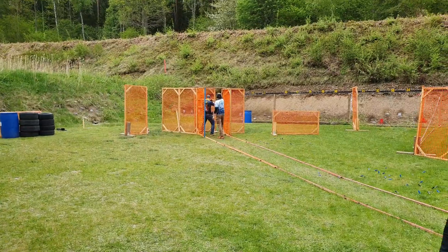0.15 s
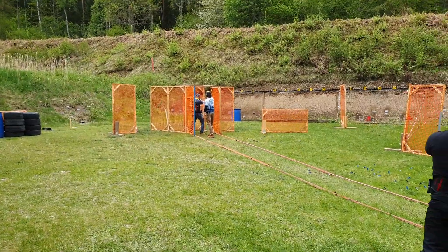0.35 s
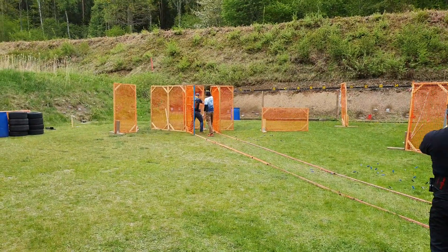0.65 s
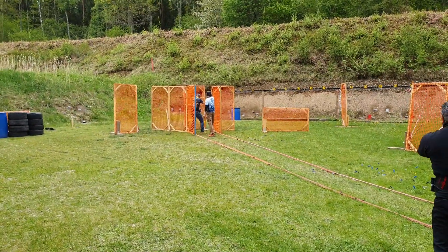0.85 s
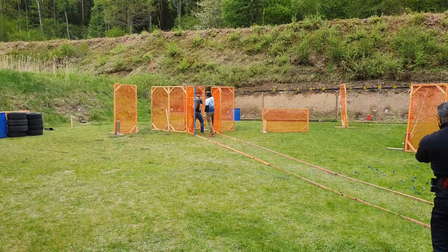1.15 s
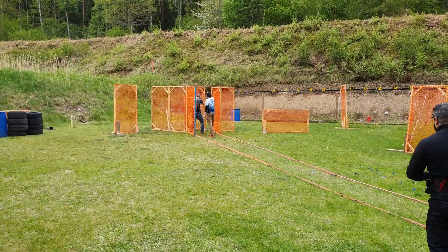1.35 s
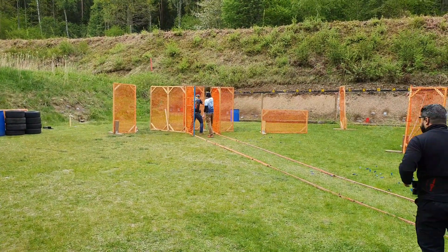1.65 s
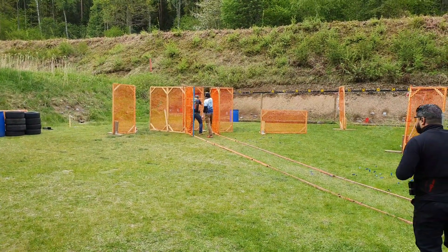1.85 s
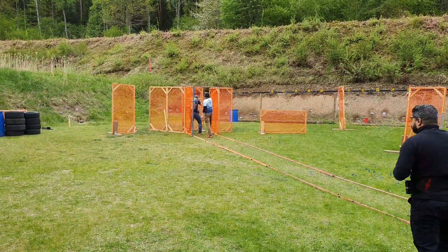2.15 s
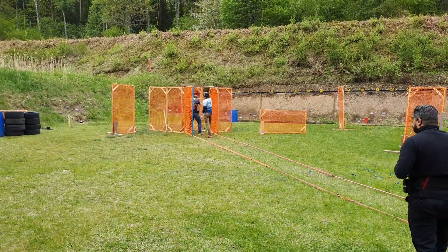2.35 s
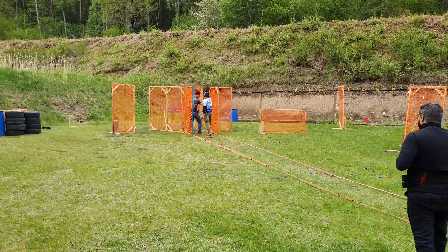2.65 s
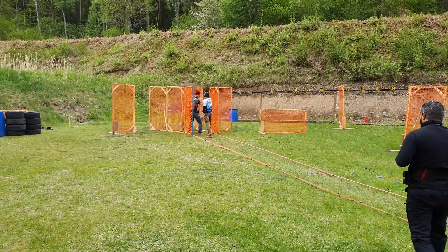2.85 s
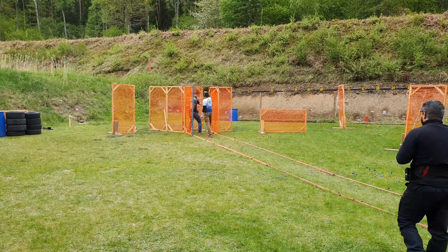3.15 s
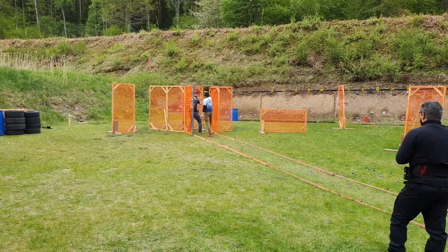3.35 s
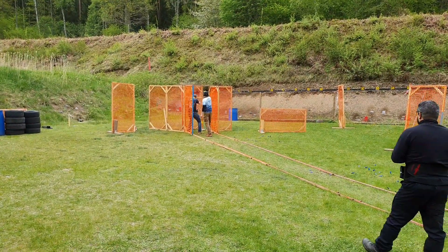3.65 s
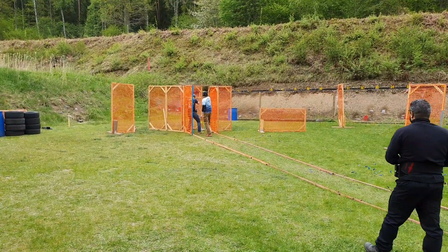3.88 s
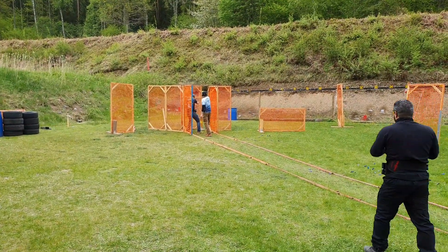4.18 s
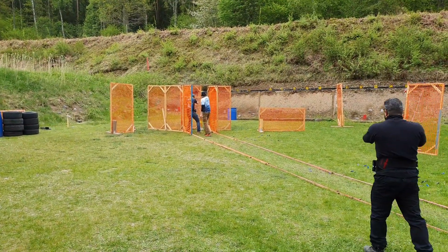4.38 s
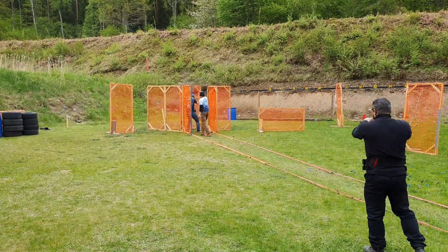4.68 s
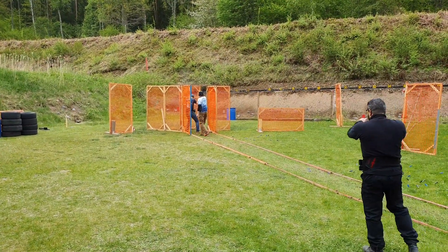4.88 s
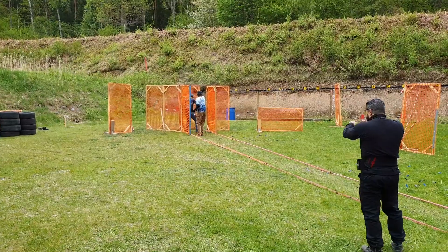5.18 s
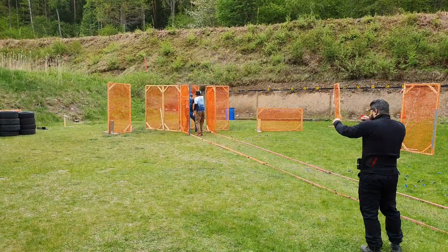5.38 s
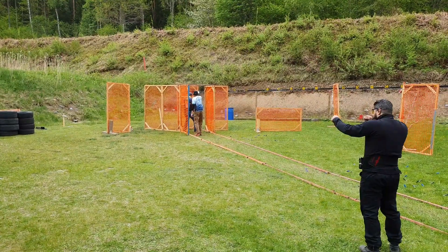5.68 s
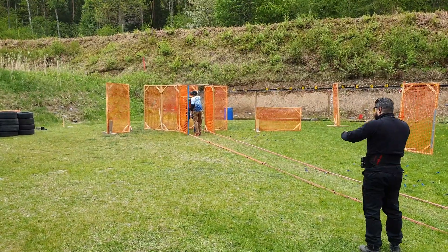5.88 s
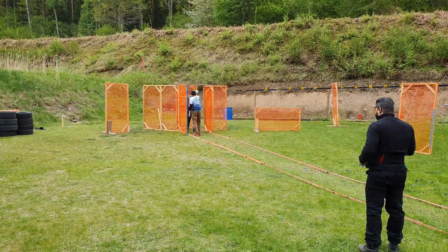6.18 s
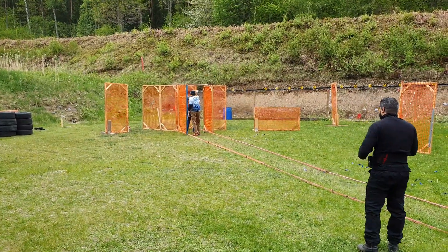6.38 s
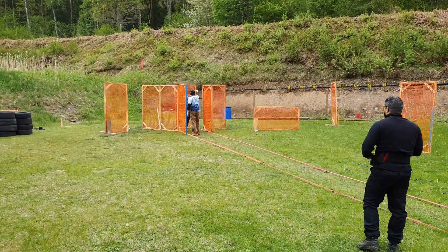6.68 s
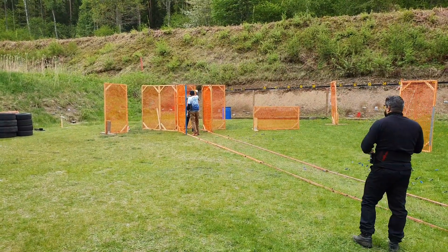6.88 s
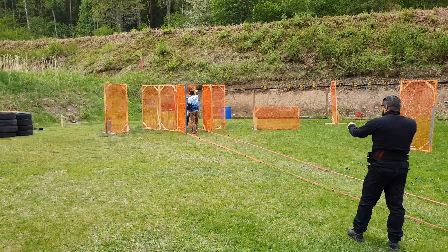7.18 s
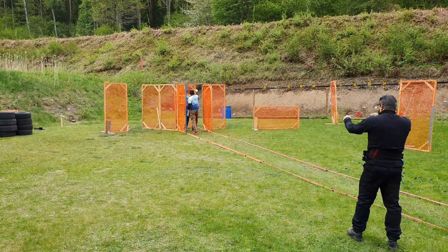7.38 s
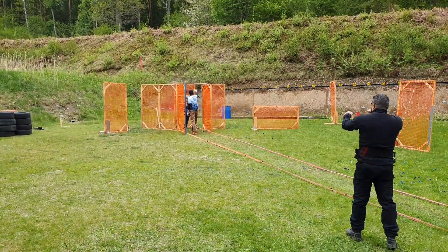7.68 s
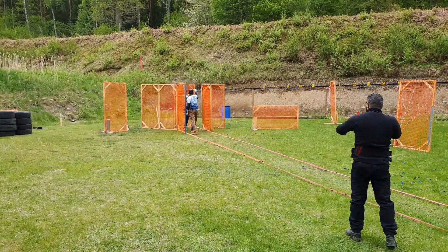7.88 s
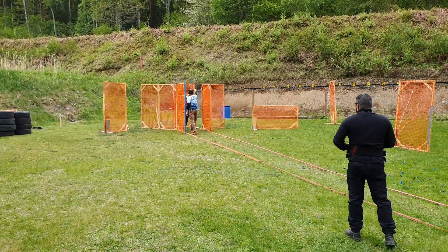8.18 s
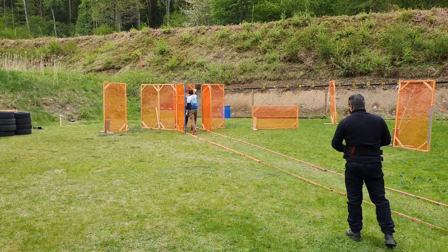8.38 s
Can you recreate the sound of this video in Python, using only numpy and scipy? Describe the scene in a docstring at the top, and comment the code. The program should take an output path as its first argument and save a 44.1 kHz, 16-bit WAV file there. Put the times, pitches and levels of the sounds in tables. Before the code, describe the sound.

Outdoors, single shotgun blasts fire about twenty metres away, slapping off earth banks and rolling through trees, with steel pings, gear clacks and wind buffeting.

```python
"""Shotgun fire in a grassy bay

Five shotgun shots some twenty metres away: pressure pulses along several paths, then echoes made of shaped noise
from the earth berms and a long roll from the forest. Four loads strike steel plates, which ring at their modes.
Metal gear clacks and clothing swishes around the shots as noise bursts; wind noise buffets the microphone.
Leaves and faint birdsong are bands of noise in the background."""
import sys
import numpy as np
from scipy import signal
from scipy.fft import rfft, irfft
from scipy.io import wavfile
from scipy.ndimage import uniform_filter1d

SR = 44100
rng = np.random.default_rng(int(sys.argv[2]) if len(sys.argv) > 2 else 0)


def dump(signal):
    """Clip the signal to [-1, 1] and save it as 16-bit WAV at the path in sys.argv[1]."""
    limited = np.clip(np.atleast_2d(signal).T, -1, 1)
    pcm = np.round(limited * 32767).astype(np.int16)
    wavfile.write(sys.argv[1], SR, pcm)


N = 376128

# the shots: (time [s], relative blast [dB], berm scatter [dB], boom [dB], backstop echo [dB],
# forest roll and far echoes [dB], their extra fading [dB/s])
SHOTS = [(1.3943, -1, 2, -2, -12, 2, 2), (2.6301, 1, 1.5, -2.5, -14.5, 2.5, 2),
         (3.3911, -1, 1.5, -1.5, -25.5, 2.5, 2.5), (4.8997, 0, 2.5, 3, -13.5, 3.5, 2.5),
         (7.6533, 1, 0, -10.5, -13, 4, 14.5)]
# scatter from the berms: (frequency [Hz], relative density [dB per Hz])
BERM_SPECTRUM = [(29, -39.5), (50, -12.5), (105, 0.5), (180, -4.5), (280, -1.5), (410, -9), (627, -1.5),
                 (836, -13), (1100, -7), (1480, -6), (2390, -7.5), (3760, -13), (5910, -16.5), (7870, -26),
                 (10700, -26), (14000, -40)]
# scatter from the backstop: (frequency [Hz], relative density [dB per Hz])
BACKSTOP_SPECTRUM = [(100, -12.5), (400, -9.5), (630, -1), (850, -5), (1200, 0.5), (2300, -2.5),
                     (3200, -16.5), (7000, -32.5), (14000, -54)]
# the backstop answers from its foot, then its face: (delay [s], relative level [dB], spread [s])
BACKSTOP_SLAPS = [(.0775, -4, .0025), (.0848, 0, .0042)]
# echoes from far banks and stands of trees: (delay [s], relative level [dB])
FAR_ECHOES = [(.123, -30), (.193, -34), (.237, -29.5), (.289, -32.5), (.397, -34), (.493, -32.5),
              (.538, -38), (.604, -36.5), (.621, -40), (.75, -45)]
FAR_SPREAD_S = .008
# colour of the far echoes: (frequency [Hz], relative density [dB per Hz])
FAR_SPECTRUM = [(150, -26), (350, -2.5), (560, 5.5), (1000, 0), (1400, -7.5), (2200, -8.5), (3500, -17),
                (7000, -37.5), (14000, -66)]
# the roll from the forest: (frequency [Hz], relative density [dB per Hz])
FOREST_SPECTRUM = [(29, -41.5), (50, -12.5), (81, -7), (204, -20), (259, -7.5), (399, -9), (584, -3.5),
                   (836, -4.5), (2150, -5.5), (2600, -10), (4770, -18.5), (5910, -18), (8070, -28),
                   (14000, -41.5)]
# loss in the roll as it ages; negative rows gain: (frequency [Hz], loss rate [dB/s])
AIR_LOSS = [(60, 28), (160, 27), (300, 6), (470, -16.5), (700, 3.5), (1400, 4.5), (1850, -6.5), (2200, 3.5),
            (2700, 13), (3400, 1), (4600, 18), (7000, 24.5), (14000, 65)]


def shots():
    """Superposition of direct sound, early echoes and a diffuse tail whose spectrum changes with age."""
    out = np.zeros((2, N))
    t = np.arange(2 ** 16) / SR
    berms = ground_scatter(BERM_SPECTRUM, len(t), lump_db=2.0, lump_hz=800, change=.5)
    faces = ground_scatter(BACKSTOP_SPECTRUM, len(t), lump_db=1.5, lump_hz=800, change=.7)
    forests = ground_scatter(FOREST_SPECTRUM, len(t), lump_db=1.2, lump_hz=150, change=.4)
    banks = ground_scatter(FAR_SPECTRUM, len(t), lump_db=1.5, lump_hz=500, change=.5)
    far = slaps(t, [(delay, db, FAR_SPREAD_S) for delay, db in FAR_ECHOES])
    rolls = age_roll(forests, len(t))
    bass = signal.butter(2, 260, fs=SR, output="sos")
    for row, berm, face, bank, roll in zip(SHOTS, berms, faces, banks, rolls):
        s, db, berm_db, boom_db, backstop_db, forest_db, fading = row
        # the boom level also sets the bass of the berm scatter
        berm = berm + (amp(boom_db) - 1) * signal.sosfiltfilt(bass, berm)
        slap = berm * amp(berm_db) * berm_return(t)
        backstop = face * amp(backstop_db) * slaps(t, BACKSTOP_SLAPS)
        distant = (roll * forest_return(t) + bank * far) * amp(forest_db - fading * t)
        thump = amp(boom_db - 21.0) * boom(t)
        add(out, s, amp(db) * blast())
        add(out, s, slap + backstop + distant + thump)
    return out * amp([[.3], [-.3]])  # left, right


# the blast comes from the left, its echoes from further ahead: (lag of right ear [ms], right ear [dB])
DIRECT_EAR, ECHO_EAR = (0.089, -8.5), (0.094, 0.12)
# distinct paths of the blast: (delay [s], relative level [dB], length of the pressure push [ms])
PATHS = [(0, 3.5, .42), (.0013, -6, .25), (.0361, 1.5, .2), (.0378, -6, .22), (.0394, -2.5, .7),
         (.0411, -3, .24), (.0428, -5, .3), (.0492, -6, .35), (.0765, -10, .8), (.0835, -9, .7)]
# scatter from the screens round the shooter: (frequency [Hz], relative density [dB per Hz])
SCREENS_SPECTRUM = [(35, -29.5), (90, -3.5), (240, -2), (418, -13), (798, 2.5), (1450, -6.5), (1800, 0),
                    (2650, -12), (3270, -4), (4950, -26.5), (5950, -18), (14000, -36)]


def blast():
    """Multipath propagation: delayed pulses of the muzzle blast, with a short rattle scattered by the screens."""
    t = np.arange(SR // 8) / SR
    pulses = np.zeros((2, len(t)))
    for delay, db, push_ms in PATHS:
        lag_ms, right_db = DIRECT_EAR if delay < .01 else ECHO_EAR
        late = t - delay - .0002
        left = shock(late, push_ms)
        right = amp(right_db) * shock(late - lag_ms / 10 ** 3, push_ms)
        pulses += amp(db) * np.array([left, right])
    # soft ground takes the deepest bass out of a grazing wave
    pulses = signal.sosfilt(signal.butter(1, 220, "high", fs=SR, output="sos"), pulses)
    rattle = noise(SCREENS_SPECTRUM, len(t), lag_ms=0.074) * swell(t, rise=0.00074, fall=0.0052)
    return amp(3.0) * pulses + amp(-9.5) * rattle


def shock(t, push_ms):
    """Blast wave: a steep push, then a longer suction; longer pushes also rise more slowly."""
    u = t * 10 ** 3 / push_ms
    front = (1 + np.tanh(u * 5)) / 2
    return front * (1 - np.maximum(u, 0)) * np.exp(-np.maximum(u, 0))


# slaps from the banks round the bay: (delay [s], level [dB], spread [s])
BERM_SLAPS = [(.0402, -16, .0036), (.0495, -19.5, .0022), (.083, -21, .007)]
# scatter from the screens and side bank, until the first berm answers: (time [s], level [dB])
NEAR_SCATTER = [(0, -45), (.006, -24), (.02, -22), (.036, -26), (.06, -60)]
# scatter trapped between the berms
BAY_START_S, BAY_ATTACK_S, BAY_HOLD_UNTIL_S = .036, 0.015, 0.1
BAY_DB, BAY_FADE_DB_PER_S = -21, 223.5


def berm_return(t):
    """Early reflections add in power: each bank slaps once, while scatter fills the bay, holds and drains away."""
    attack = np.clip((t - BAY_START_S) / BAY_ATTACK_S, 0, 1)
    fill = attack * amp(BAY_DB - BAY_FADE_DB_PER_S * np.maximum(t - BAY_HOLD_UNTIL_S, 0))
    near = amp(curve(NEAR_SCATTER, t)) * (t < NEAR_SCATTER[-1][0])
    return np.sqrt(slaps(t, BERM_SLAPS) ** 2 + near ** 2 + fill ** 2)


def boom(t, delay=0.098, length=0.0095, hz=88):
    """Specular reflection: the broad face of the backstop sends the bass back as one slow thump."""
    return bump(t, delay, length) * np.sin(2 * np.pi * hz * (t - delay))


ROLL_DB, ROLL_BUILD_S = -25.5, 0.15
ROLL_FADE_DB_PER_S, ROLL_LATE_S, LATE_FADE_DB_PER_S = 26.5, 0.77, 25.5  # the late fade adds to the first


def forest_return(t):
    """Diffuse decay: the roll builds as the wave enters the trees, then fades, faster past the last of them."""
    fade_db = ROLL_FADE_DB_PER_S * t + LATE_FADE_DB_PER_S * np.maximum(t - ROLL_LATE_S, 0)
    return (1 - bump(t, 0, ROLL_BUILD_S)) * amp(ROLL_DB - fade_db)


def age_roll(forests, n):
    """Frequency-dependent decay: the patchy roll loses its treble in the air as it ages."""
    hz, age, spectra = signal.stft(np.array(forests), SR, nperseg=512)
    # each clump of trees sends back its own colour, the same for every shot
    patches = rng.standard_normal(spectra.shape[2:])
    patches = uniform_filter1d(patches, size=4, axis=0)
    patches = unit(uniform_filter1d(patches, size=6, axis=1))
    colour_db = 2.2 * patches - read(AIR_LOSS, hz)[:, None] * (age - .25)
    return signal.istft(spectra * amp(colour_db), SR, nperseg=512)[1][..., :n]


def ground_scatter(spectrum, n, lump_db, lump_hz, change):
    """Partial coherence: the terrain is the same for every shot, the moving air changes a share of its scatter."""
    change = np.clip(change, 0, 1)
    terrain = noise(spectrum, n, lag_ms=0.016)
    lumps = amp(lump_db * waver(n, lump_hz))
    patterns = []
    for _ in SHOTS:
        changed = noise(spectrum, n, lag_ms=0.052)
        patterns.append(unit(lumps * (np.sqrt(1 - change) * terrain + np.sqrt(change) * changed)))
    return patterns


def slaps(t, rows):
    """Energy summation: the joint envelope of separate echoes, each a short bump."""
    return np.sqrt(sum((amp(db) * bump(t, delay, spread)) ** 2 for delay, db, spread in rows))


# pellets on steel: (time [s], crash in the left ear [dB], crash centre [Hz], crash width [octaves],
# ring gain [dB], centre of the woken modes [Hz], their range [octaves])
STRIKES = [(1.46, -14, 6500, 0.55, 4.5, 6960, 1.1), (2.6948, -12, 7960, 0.75, 9, 5500, 1.8),
           (3.4550, -9, 3260, 0.22, 6, 5750, .27), (3.508, -29, 5500, 0.61, 8.5, 5750, 0.081),
           (4.964, -25.5, 5000, 0.67, 2.5, 3000, 1.3)]
# modes of a steel plate: (frequency [Hz], relative level [dB], decay time by 60 dB [s])
PLATE_MODES = [(2350, -35, .5), (2755, -33, .45), (4398, -37.5, .5), (5310, -45, .3), (5745, -37.5, .52),
               (7768, -42, .35), (8640, -46, .35), (10433, -39, .45), (11300, -44, .45)]
# dense high modes blurred into a shimmer: (frequency [Hz], relative density [dB per Hz])
SHIMMER_SPECTRUM = [(2000, -24), (4700, -6.5), (6800, 6), (7700, -14.5), (11000, -7), (14000, -27.5)]
SHIMMER_DB, SHIMMER_T60_S = -31.5, 0.44


def plates():
    """Modal excitation: a cloud of pellets lands within milliseconds and wakes steel modes that ring on."""
    out = np.zeros((2, N))
    t = np.arange(SR * 3 // 4) / SR
    lead = .004  # s, room for the crash to rise before its peak
    for s, crash_db, hz, width, ring_db, ring_hz, ring_range in STRIKES:
        colour = [(hz * 2 ** (k * width), -6 * k * k) for k in range(-4, 4)]
        crash = noise(colour, len(t)) * np.exp(-abs(t - lead) / 0.00089)
        crash = crash * amp([[crash_db], [crash_db - 6]])
        ring = np.zeros((2, len(t)))
        for f, db, t60 in PLATE_MODES:
            # the plate topples, so each mode flutters in and out on its own
            flutter = unit(waver(len(t), 35) + 1)
            woken_db = db - 6 * (np.log2(f / ring_hz) / ring_range) ** 2
            tone = np.sin(2 * np.pi * (f * t + rng.random((2, 1))))
            ring += flutter * amp(woken_db - 60 * t / t60) * tone
        shimmer = noise(SHIMMER_SPECTRUM, len(t)) * amp(SHIMMER_DB - 60 * t / SHIMMER_T60_S)
        onset = 1 - np.exp(-t / 0.008)
        add(out, s - lead, crash + (amp(ring_db) * ring + shimmer) * onset)
    return out


# knocks of metal gear at the firing point: (time [s], relative level [dB], hollow body [dB])
CLACKS = [(4.221, -49.5, -6), (4.422, -48, -23), (4.485, -36, -4.5), (4.601, -46.5, -15), (4.646, -41, -3),
          (4.655, -40.5, -7), (6.547, -55.5, -17.5), (6.868, -45.5, -9), (6.915, -47, 1.5),
          (6.955, -53, 10), (6.969, -40.5, -4), (6.981, -40, -6), (8.440, -49, -12)]
# grit of the metal: (frequency [Hz], relative density [dB per Hz])
GRIT_SPECTRUM = [(200, -10), (1600, -9), (3100, -3), (3600, -4), (4900, -12), (5800, -4.5), (8000, -15.5),
                 (14000, -18)]
# modes of the hollow body: (frequency [Hz], relative level [dB])
BODY_MODES = [(585, -2), (690, -3), (1780, -4.5), (2150, -7.5)]
# small high tinks: (time [s], relative level [dB])
TINKS = [(0.637, -51), (0.6576, -43)]
SLIDE_S, GEAR_HZ = 0.014, [1860, 2780, 3200, 5900]  # spread of the slide, modes of the metal parts


def clacks():
    """Friction and impact: parts slide, knock and ring briefly; the berm echoes each knock and the bay hisses."""
    out = np.zeros((2, N))
    t = np.arange(SR // 2) / SR - 2 * SLIDE_S  # zero at the knock
    knock = swell(t, rise=0.0021, fall=0.0082)
    slide = amp(-16) * bump(t, 0, SLIDE_S)
    echo = amp(-4.5) * np.interp(t - .04, t, knock, left=0)
    wash = amp(-13.5) * swell(t, rise=0.0032, fall=0.094)
    envelope = np.sqrt(slide ** 2 + knock ** 2 + echo ** 2 + wash ** 2)
    for s, db, body_db in CLACKS:
        grit = unit(noise(GRIT_SPECTRUM, len(t)) * amp(1.3 * waver(len(t), 700)))
        body = sum(amp(mode_db) * np.sin(2 * np.pi * (hz * t + rng.random())) for hz, mode_db in BODY_MODES)
        clatter = grit * envelope + amp(body_db) * body * swell(t, rise=0.0018, fall=0.0077)
        ring = sum(np.sin(2 * np.pi * (hz * t + rng.random((2, 1)))) for hz in GEAR_HZ)
        ring = ring * swell(t, rise=0.0014, fall=0.011)
        add(out, s - 2 * SLIDE_S, amp(db) * (clatter + amp(-11.0) * ring))
    for s, db in TINKS:
        ping = noise([(1500, -26), (2400, -9), (3300, 0), (4500, -15), (14000, -38)], len(t))
        add(out, s - 2 * SLIDE_S, amp(db) * ping * swell(t, rise=.0006, fall=.003))
    return out * amp([[.8], [0]])  # left, right


# swishes of clothing: (time of peak [s], spread [s], relative level [dB])
RUSTLES = [(0.051, 0.23, -65), (.67, 0.15, -64), (6.6, 0.44, -74.5)]
# colour of the cloth: (frequency [Hz], relative density [dB per Hz])
CLOTH_SPECTRUM = [(500, -9.5), (2500, -1.5), (4800, -8), (6500, -5.5), (8000, -30), (11000, -18),
                  (14000, -16.5)]


def rustles():
    """Friction noise: clothing swishes faintly as someone moves near by."""
    t = np.arange(N) / SR
    level = sum(amp(db) * bump(t, s, spread) for s, spread, db in RUSTLES)
    return noise(CLOTH_SPECTRUM, N) * level * amp(2.3 * waver(N, 50))


# the slow breeze on the microphone: (time [s], relative level [dB])
BREEZE = [(0, -48), (.7, -47), (1.25, -56.5), (2.5, -72.5), (3, -55.5), (3.3, -69.5), (3.9, -55),
          (5.2, -49.5), (6.2, -59.5), (7.4, -56), (8.2, -78.5)]
BREEZE_LEFT_DB, BREEZE_WAVER_DB = 7.5, 3.5  # left minus right, rms of the wavering
# gusts on the microphone: (time of peak [s], spread [s], relative level [dB], left minus right [dB])
GUSTS = [(0.068, 0.11, -31.5, 5), (.3, 0.11, -41, -2.5), (.77, 0.058, -38, 6.5), (.87, .03, -36.5, 3),
         (0.989, 0.097, -45.5, 6.5), (4.767, 0.029, -38, 14), (4.88, 0.048, -36.5, 2),
         (5.76, 0.025, -43, -8.5), (6.05, .06, -45.5, 3.5), (6.437, 0.082, -45, 3),
         (6.653, 0.058, -37.5, 10.5), (6.79, 0.081, -41.5, 8.5), (7.05, 0.07, -44.5, 8),
         (7.509, 0.055, -41, 2), (7.65, 0.043, -35.5, 4)]
# turbulence at the microphone: (frequency [Hz], relative density [dB per Hz])
BUFFET_SPECTRUM = [(12, -46), (20, -11.5), (49, 2.5), (85, 2), (209, -17), (295, -20), (499, -33.5),
                   (780, -47.5), (1320, -120)]


def wind():
    """Turbulent pressure at the two ports: gusts ride on a slow breeze, and strong ones reach higher in pitch."""
    t, sides = np.arange(N) / SR, np.array([[.5], [-.5]])
    breeze_db = curve(BREEZE, t) + sides * BREEZE_LEFT_DB + BREEZE_WAVER_DB * waver(N, 8.3)
    power = amp(breeze_db) ** 2
    for s, spread, db, left_db in GUSTS:
        power = power + (amp(db + sides * left_db) * bump(t, s, spread)) ** 2
    level_db = 10 * np.log10(power)
    turbulence = noise(BUFFET_SPECTRUM, N, same=[(30, 0.14), (300, 0.33)])
    deep = signal.sosfilt(signal.butter(3, 140, fs=SR, output="sos"), turbulence)
    force = np.clip((level_db + 57.0) / 14, 0, 1)
    lumps = unit(amp(2.6 * waver(N, 22)))
    return unit(force * turbulence + (1 - force) * deep) * lumps * amp(level_db)


# single sharp eddies that hit the microphone: (time [s], relative level [dB])
EDDIES = [(0.116, -37), (0.336, -34), (0.391, -34.5), (.742, -34), (0.974, -30.5), (4.541, -41.5),
          (4.862, -33.5), (6.015, -35.5)]


def eddies():
    """Vortex impact: now and then a small eddy thuds right on the ports."""
    out = np.zeros((2, N))
    t = np.arange(SR // 5) / SR
    puff_spectrum = [(30, -8.0), (110, -1.5), (320, -10.5), (600, -28.0), (2000, -52.0), (14000, -120)]
    for s, db in EDDIES:
        puff = noise(puff_spectrum, len(t)) * swell(t, rise=0.0058, fall=0.01)
        add(out, s - .01, amp(db) * puff)  # starts 10 ms ahead of the listed time
    return out * amp([[5], [0]])  # left, right


# leaves of the forest: (frequency [Hz], relative density [dB per Hz])
LEAVES_SPECTRUM = [(40, -11.5), (500, 1), (1000, 4.5), (2000, -2.5), (2700, -21.5), (4000, -26),
                   (6500, -18.5), (8000, -41.5), (14000, -47)]
# their level: (time [s], level [dB])
LEAVES_LEVEL = [(0, -56.5), (.5, -60), (1.3, -61), (2.5, -64), (6.2, -63), (7.4, -60), (8.5, -66)]
# far birdsong, blurred by the trees into a faint high band: (frequency [Hz], relative density [dB per Hz])
BIRDS_SPECTRUM = [(1500, -55.5), (3000, -9), (4000, -6.5), (4400, -16.5), (8000, -51)]
# its level: (time [s], level [dB])
BIRDS_LEVEL = [(0, -75), (.4, -71), (1.4, -74), (2.2, -87.5)]


def woods():
    """Incoherent sum of many far sources: leaves hiss, and birds twitter faintly among them."""
    t = np.arange(N) / SR
    leaves = noise(LEAVES_SPECTRUM, N) * amp(curve(LEAVES_LEVEL, t) + 0.5 * waver(N, 4.8))
    birds = noise(BIRDS_SPECTRUM, N) * amp(curve(BIRDS_LEVEL, t) + 2 * waver(N, 14))
    return leaves + birds


# likeness of the two ears: (frequency [Hz], coherence [-1 to 1])
EAR_COHERENCE = [(60, 1), (670, 0.7), (850, 0.022), (1100, 0.11), (1500, -0.44), (2200, .15), (3200, .04),
                 (14000, -0.16)]


def noise(spectrum, n, same=EAR_COHERENCE, lag_ms=0):
    """Interaural coherence: stereo noise of rms 1 with a given colour, likeness and lag of the right ear."""
    hz = np.fft.rfftfreq(n, 1 / SR)
    left, other = rfft(rng.standard_normal((2, n)))
    c = np.clip(read(same, hz), -1, 1)
    lag = np.exp(-2j * np.pi * hz * lag_ms / 10 ** 3)
    right = (c * left + np.sqrt(1 - c ** 2) * other) * lag
    return unit(irfft(np.array([left, right]) * amp(read(spectrum, hz)), n))


def waver(n, rate_hz):
    """Low-passed random modulation: smooth chance of rms 1, moving up to about rate_hz."""
    hz = np.fft.rfftfreq(n, 1 / SR)
    return unit(irfft(rfft(rng.standard_normal(n)) * np.exp(-(hz / rate_hz) ** 2), n))


def swell(t, rise, fall):
    """Exponential build-up and decay, silent before time zero."""
    t = np.maximum(t, 0)
    return (1 - np.exp(-t / rise)) * np.exp(-t / fall)


def bump(t, centre, spread):
    """Gaussian envelope: a smooth rise and fall of height 1."""
    return np.exp(-((t - centre) / spread) ** 2)


def amp(db):
    """Logarithmic level: decibels to gain."""
    return 10 ** (np.asarray(db) / 20)


def unit(x):
    """Effective value: scales to rms 1."""
    return x / np.sqrt(np.mean(x ** 2) + 1e-20)


def curve(rows, t):
    """Linear interpolation of rows in time."""
    return np.interp(t, *np.transpose(rows))


def read(rows, hz):
    """Linear interpolation of rows on a log-frequency axis."""
    f, value = np.transpose(rows)
    return np.interp(np.log(hz + 1), np.log(f + 1), value)


def add(mix, s, sound):
    """Superposition: mixes a stereo sound in at time s."""
    part = mix[:, round(s * SR):][:, :sound.shape[1]]
    part += sound[:, :part.shape[1]]


def scene():
    """Superposition of everything that reaches the microphone."""
    return shots() + plates() + clacks() + rustles() + wind() + eddies() + woods()


EDGE_HZ = 15100  # upper band limit


def record(dry):
    """Transducer limits: the microphone sheds its deepest bass, the blasts just overload it, the band ends."""
    thinned = signal.sosfilt(signal.butter(2, 38, "high", fs=SR, output="sos"), dry)
    clipped = np.clip(thinned, -1, 1)
    band_limit = signal.firwin(255, EDGE_HZ, window=("kaiser", 8), fs=SR)
    return signal.oaconvolve(clipped, band_limit[None], "same")


dry = scene()
out = record(dry)
dump(out)
```